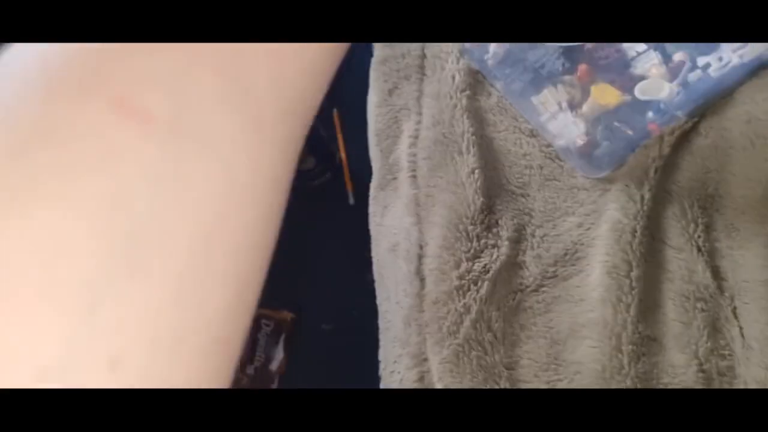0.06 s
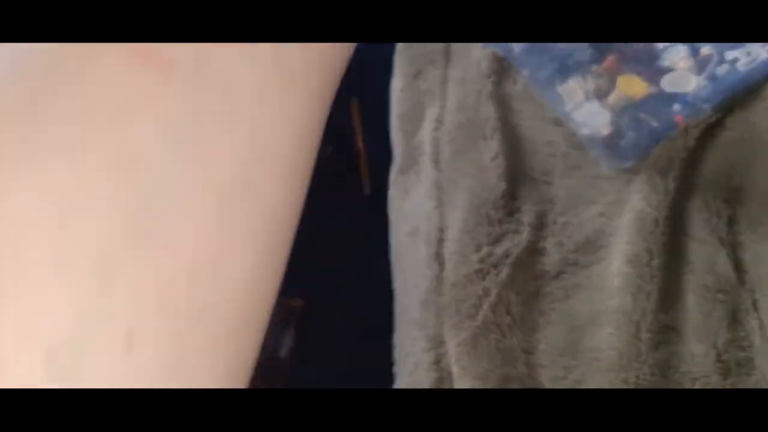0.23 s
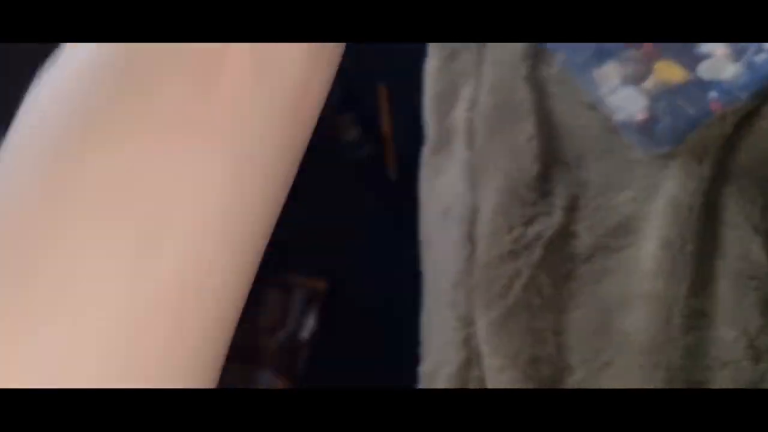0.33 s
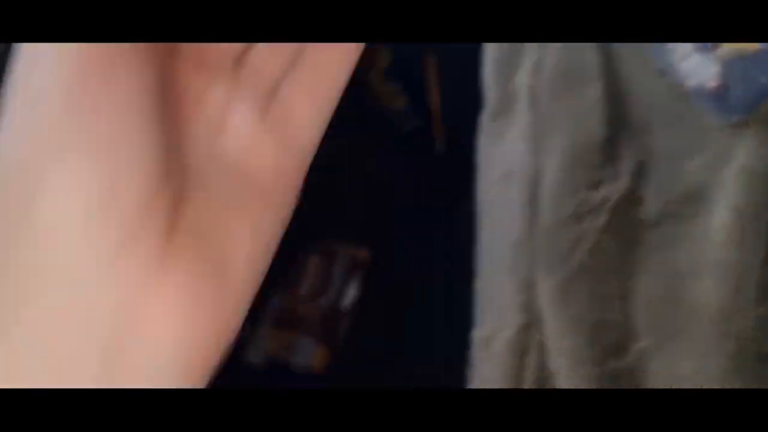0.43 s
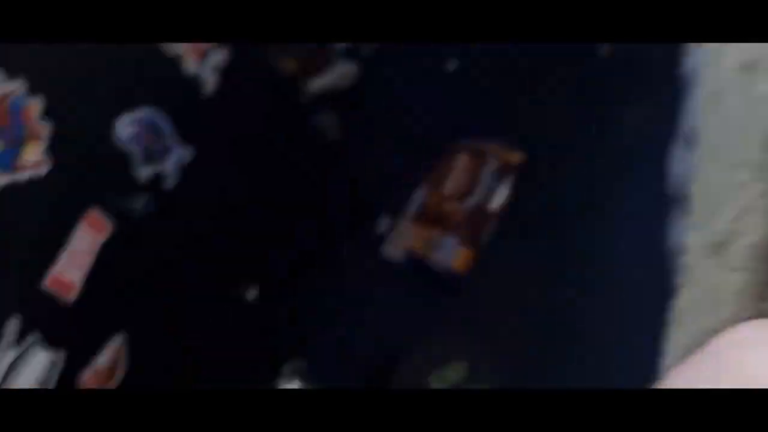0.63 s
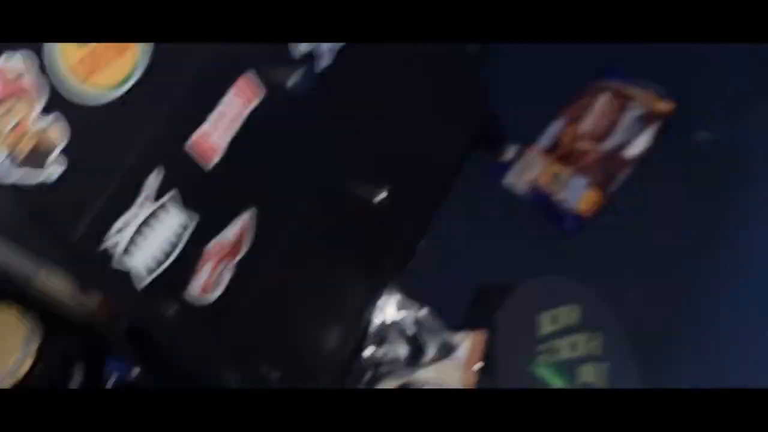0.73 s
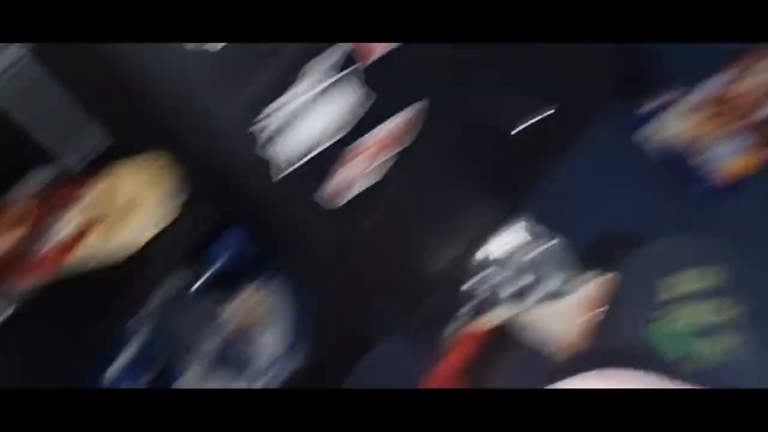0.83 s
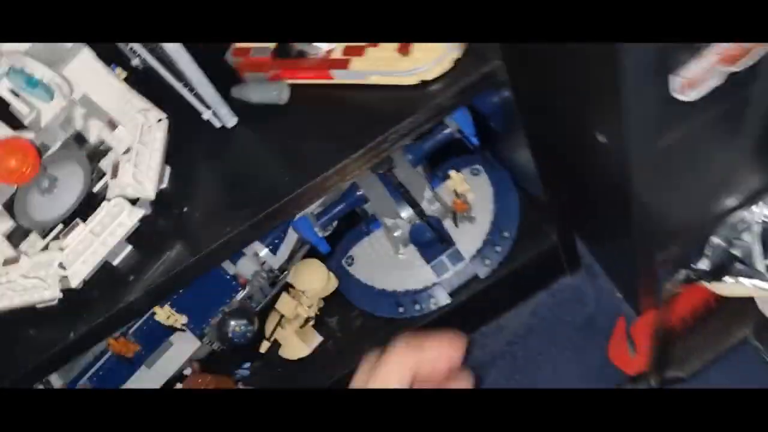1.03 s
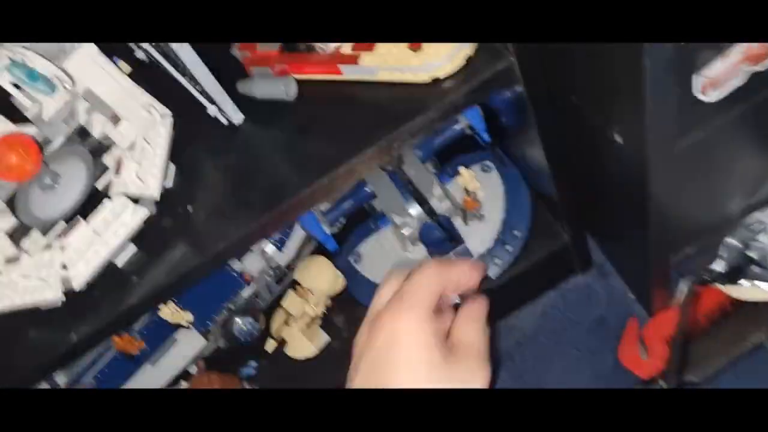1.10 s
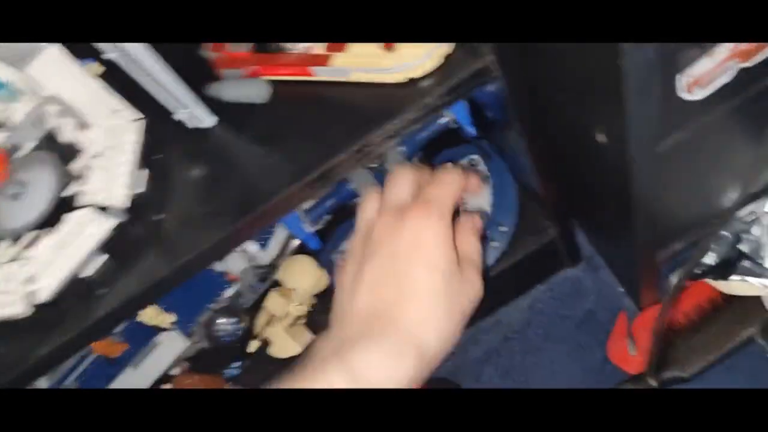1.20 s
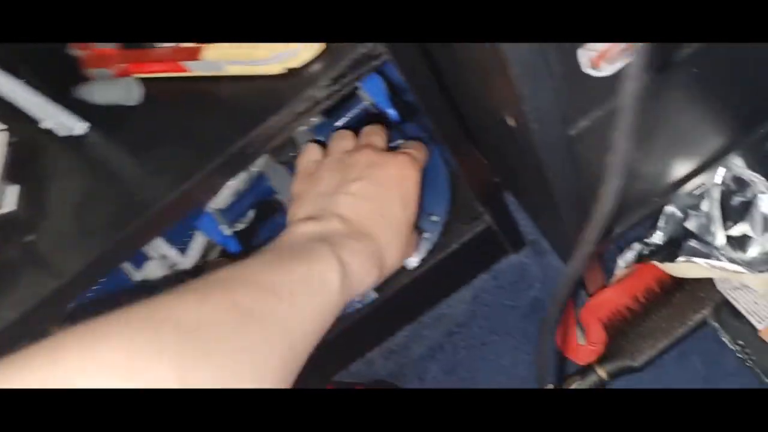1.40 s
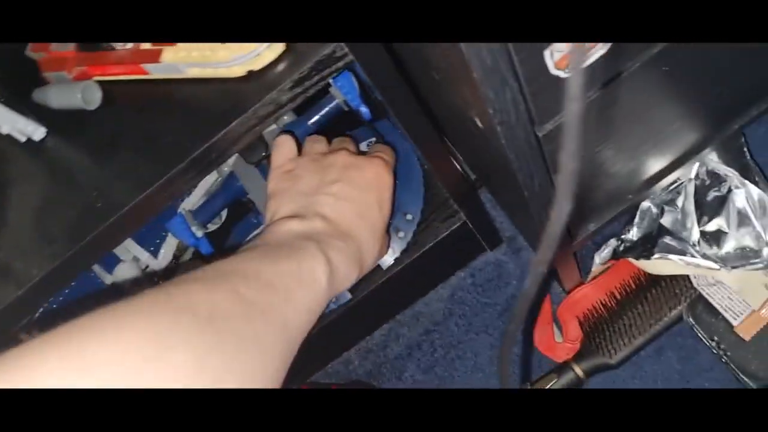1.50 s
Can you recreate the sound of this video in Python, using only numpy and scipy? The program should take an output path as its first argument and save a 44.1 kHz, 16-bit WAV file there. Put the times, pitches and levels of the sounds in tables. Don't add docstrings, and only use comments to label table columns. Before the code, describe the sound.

After a faint rustle and tick, a burst of plastic bricks rattles and booms on a board, thinning to single knocks; low grip thumps and a cloth brush follow, then a very faint finger touch, close indoors.

```python
import sys
import numpy as np
from scipy import signal
from scipy.fft import rfft, irfft
from scipy.io import wavfile

SR = 44100
rng = np.random.default_rng(int(sys.argv[2]) if len(sys.argv) > 2 else 0)


def invert_db(x):
    u = np.asarray(x, float) / 20
    return 10 ** u


def to_wav(sig):
    pcm = np.clip(np.atleast_2d(sig), -1, 1) * 32767
    pcm = np.round(pcm).astype(np.int16)
    wavfile.write(sys.argv[1], SR, pcm.T)


N = 68355

# (time [s], level [dB], treble [dB])
TUMBLE_STAGES = [
    [(0.2315, -30, -14), (0.238, -34, -10.5), (0.253, -29, -14.5), (0.275, -33, -17.5), (0.278, -32, -10),
     (0.287, -25, -19.5), (0.296, -28, -3), (0.303, -29, -9.5), (0.318, -29, -15.5)],
    [(0.335, -36.5, -15.5), (0.385, -41, -19.5), (0.4, -47, -19), (0.405, -40, -18.5), (0.437, -39.5, -15),
     (0.47, -44.5, -17.5), (0.478, -46, -20), (0.49, -49, -22)],
    [(0.493, -50.5, -27), (0.516, -46.5, -33), (0.526, -43.5, -30), (0.544, -55, -30), (0.588, -57.5, -29),
     (0.607, -50, -27), (0.611, -47.5, -24), (0.646, -54.5, -15.5), (0.69, -72.5, -19.5)],
]
# (frequency [Hz], gain [dB])
BRICK_COLOUR = [(300, -25), (600, -11.5), (1150, -7.5), (1700, -8), (7300, -8), (7900, -17.5), (12900, -12),
                (15800, -18)]
# (frequency [Hz], level [dB], time to fall 60 dB [s])
BOARD_MODES = [(715, 0.5, .12), (782, -6, .12), (893, -11, .12), (960, -9, .1), (1118, -1, 0.34),
               (1440, -10, .1), (1767, -3, 0.12), (2312, -12, .08), (2560, -11, 0.21), (2740, -8.5, 0.11),
               (3590, -3.5, .07)]
# (time [s], peak [dB], favoured pitch [Hz])
SHELF_LANDINGS = [(.232, -10.5, 290), (.242, -18, 333), (.252, -8, 262), (.268, -26, 332), (.289, -10, 213),
                  (.294, -5, 222), (.302, -28, 700), (.315, -14, 357), (.324, -20, 347), (.357, -21.5, 356),
                  (.37, -14.5, 328), (.39, -44, 300), (.407, -25, 400), (.415, -17.5, 433),
                  (.433, -36, 430), (.446, -32, 370), (.469, -28.5, 376), (.492, -34, 410), (.52, -27, 430),
                  (.526, -36.5, 468), (.603, -32.5, 350), (.608, -42, 450), (1.247, -52.5, 331),
                  (1.257, -45.5, 399)]
# (frequency [Hz], level [dB], time to fall 60 dB [s])
SHELF_MODES = [(212, -1, .06), (263, 0, .08), (327, 3, .09), (358, 0, .13), (432, 1, .11), (540, -15, .1),
               (704, -9, .08), (958, -12, .06), (1133, -7, .09)]
# (time [s], peak [dB], pitch [Hz], ring length [cycles])
BRICK_KNOCKS = [(0.2325, -19, 7000, 46), (.278, -14, 6130, 30), (.287, -9, 4150, 25),
                (.305, -18.5, 1450, 28), (0.399, -24, 960, 8.8), (.404, -24, 3550, 21),
                (0.433, -18.5, 1120, 14), (.432, -29.5, 3670, 52), (0.4917, -20, 1090, 5.2),
                (.519, -31, 920, 6), (0.525, -39, 3500, 22), (0.5504, -22.5, 1206, 17),
                (.568, -29, 880, 3.8), (0.568, -44, 6100, 50), (.58, -43, 6200, 53), (0.609, -40, 4870, 15),
                (.612, -26, 1220, 12), (0.621, -49, 1000, 6.6), (.694, -36, 490, 32),
                (0.699, -38.5, 1000, 7.3), (.7, -46, 508, 18), (.703, -34, 497, 19), (0.761, -37, 1240, 13),
                (.764, -43.5, 745, 31), (0.764, -42, 1780, 31), (1.257, -59.5, 1060, 57),
                (1.247, -58, 1860, 12), (1.248, -53, 395, 46), (1.262, -57, 305, 16.5),
                (1.486, -38.5, 310, 38), (1.513, -43, 306, 56)]
# (time [s], level [dB])
PART_RUSTLES = [
    [(0, -59), (.04, -68.5), (.06, -60), (.1, -61), (.125, -69), (.16, -83.5)],
    [(1.465, -80), (1.479, -57), (1.497, -67), (1.505, -77)],
]
# (time [s], peak [dB])
PART_TICKS = [
    (0.062, -44),
    (0.073, -62),
    (0.082, -35),
    (0.083, -74),
    (0.092, -75),
]
# (frequency [Hz], level [dB], time to fall 60 dB [s])
PART_MODES = [(3840, -14, .02), (5800, -11, .025), (7197, -23, .06), (9546, -21, .12)]
# (time [s], peak [dB])
MODEL_TOUCHES = [
    (1.471, -68.5),
    (1.4775, -51.5),
    (1.479, -55),
    (1.481, -53.5),
    (1.483, -52),
    (1.4855, -55),
    (1.488, -57),
    (1.492, -61.5),
    (1.495, -61),
    (1.498, -64),
]
# (frequency [Hz], level [dB], time to fall 60 dB [s])
MODEL_PLATES = [(675, -6, 0.075), (1234, -10, 0.028), (1612, 0, 0.076), (2150, -3, 0.043), (2666, 4, 0.068),
                (3160, -9, 0.019), (3794, -5, 0.03), (4690, -12.5, 0.045), (5490, -11, 0.053),
                (7010, -3, 0.026), (6950, -14, .03), (8350, -14.5, 0.025)]
# (time [s], peak [dB], pitch [Hz], left minus right [dB])
GRIP_SLIPS = [(0.728, -27.5, 187, 7.5), (0.742, -26, 182, 3), (0.758, -28.5, 190, 3.5),
              (0.765, -26, 210, 4), (0.786, -28, 210, 4), (0.805, -28.5, 190, 5), (0.827, -34.5, 200, -0.5),
              (0.845, -41, 191.5, 12), (0.853, -35.5, 190.3, 4), (0.866, -49.5, 188, -4.5),
              (1.004, -47, 193, 0), (1.137, -54, 186.8, -22.5), (1.183, -55.5, 188.3, -5.5)]
# (time [s], peak [dB], upper limit [Hz])
CASE_SNAPS = [
    (1.012, -62.5, 886),
    (1.024, -54, 1086),
    (1.034, -43, 2130),
    (1.0574, -42.5, 4060),
    (1.143, -61, 600),
]
# (time [s], level [dB])
CASE_RASP = [
    (1.049, -103),
    (1.051, -74),
    (1.0535, -70),
    (1.055, -91.5),
    (1.0565, -89),
    (1.0575, -71.5),
    (1.06, -80),
    (1.063, -100),
]
# (time [s], level [dB], left minus right [dB])
HAND_PRESSURE = [(0.0, -65, 0), (0.176, -72, 6.5), (0.246, -64, -7), (0.46, -77, -11), (0.486, -55, -4),
                 (0.608, -61, 7), (0.65, -50, 18), (0.69, -65, 4.5), (0.754, -45.5, 13.5),
                 (0.854, -46, 0.5), (0.944, -62, 3.5), (1.022, -47, 4), (1.112, -63, 4),
                 (1.13, -59.5, -10.5), (1.442, -72.5, 2), (1.55, -52.5, -3)]
# (time [s], level [dB])
CLOTH_BRUSH = [
    (.69, -74.5),
    (.765, -64),
    (.83, -73),
    (.922, -72),
    (1.03, -74.5),
    (1.05, -79),
]
# (frequency [Hz], half width [Hz], level [dB])
CLOTH_BANDS = [(1700, 800, -2), (3150, 600, -1), (3800, 600, -4), (6750, 1400, -2)]
# (time [s], level [dB])
FIBRE_HISS = [
    (0.85, -99.5),
    (0.908, -73.5),
    (0.996, -81.5),
    (1.022, -85),
    (1.04, -83.5),
]
# (time [s], level [dB])
SLEEVE_RUSTLE = [
    (1.2, -100),
    (1.3, -86.5),
    (1.37, -78),
    (1.43, -85.5),
    (1.6, -82.5),
]
# (frequency [Hz], left minus right [dB])
HAND_SHADE = [(250, 2), (450, -1.5), (800, 10.5), (1500, 7.5), (3100, 18.5), (6000, 32), (8500, 49),
              (12500, 16.5)]
# (frequency [Hz], gain [dB])
HISS_COLOUR = [(100, -12.5), (450, -10), (850, -19), (2600, -24.5), (7200, -25), (7700, -36.5),
               (10500, -38), (13000, -28), (16000, -35.5)]


def noise(*shape):
    return rng.standard_normal(shape or N)


def rms_one(x):
    return x / np.sqrt(np.mean(x ** 2) + 1e-20)


def level(rows, column=1, outside_db=-140):
    rows = np.array(rows)
    return np.interp(np.arange(N) / SR, rows[:, 0], rows[:, column], outside_db, outside_db)


def colour(x, points):
    p, size = np.array(points), 8192
    hz = np.maximum(np.arange(size // 2 + 1) * SR / size, 1)
    gain_db = np.interp(np.log(hz), np.log(p[:, 0]), p[:, 1])
    cepstrum = irfft(gain_db * np.log(10) / 20)
    cepstrum[1:size // 2] *= 2
    cepstrum[size // 2 + 1:] = 0
    return signal.fftconvolve(x, irfft(np.exp(rfft(cepstrum))))[:N]


def ring(hits, hz, t60):
    r, w = invert_db(-60 / (t60 * SR)), 2 * np.pi * hz / SR
    return signal.lfilter([0, np.sin(w)], [1, -2 * r * np.cos(w), r * r], hits + 1e-18)


def soft(x, hz, kind="low"):
    return signal.sosfilt(signal.butter(2, hz, kind, fs=SR, output="sos"), x)


def clicks(s, height):
    out = np.zeros(N)
    np.add.at(out, (np.asarray(s) * SR).astype(int), height)
    return out


def fading(hits, fade_s, start=1):
    return signal.lfilter([start], [1, -np.exp(-1 / (fade_s * SR))], hits)


def grains(rate, spread_db):
    size = invert_db(spread_db * np.minimum(rng.exponential(1, N), 4.0))
    return size * rng.choice([-1, 1], N) * (rng.random(N) < rate / SR)


def panned(x, db):
    return np.array([x * invert_db(db / 2), x * invert_db(-db / 2)])


def struck(s, db, modes, spread_db):
    own = rng.normal(0, spread_db, (len(s), len(modes)))
    return sum(ring(clicks(s, invert_db(db + m + own[:, k])), hz, t60) for k, (hz, m, t60) in enumerate(modes))


def tumble():
    ring_cycles, slide_db, box_db = 19, -4, -5
    split_hz, treble_db = 6200, 15
    hits = grains(rate=4000, spread_db=3.6)
    dealt = rng.integers(0, 30, N)
    pitches = np.geomspace(450, 15000, num=30)
    bricks = sum(ring(hits * (dealt == k), hz, ring_cycles / hz) for k, hz in enumerate(pitches))
    box = sum(invert_db(db) * ring(hits, hz, t60) for hz, db, t60 in BOARD_MODES)
    mix = rms_one(bricks) + invert_db(slide_db) * noise() + invert_db(box_db) * rms_one(box)
    mix = colour(soft(mix, 350, "high"), BRICK_COLOUR)
    mix = mix / np.std(soft(mix, 1500, "high"))
    low = soft(soft(mix, split_hz), split_hz)
    high = soft(soft(mix, split_hz, "high"), split_hz, "high")
    rows = np.vstack(TUMBLE_STAGES)
    return invert_db(level(rows)) * (low + high * invert_db(treble_db + level(rows, column=2)))


def shelf():
    shelf_db, loss_db_per_octave = -11.5, 8
    s, db, near_hz = np.transpose(SHELF_LANDINGS)
    own = rng.normal(0, 1.6, (len(s), len(SHELF_MODES)))
    out = np.zeros(N)
    for k, (hz, mode_db, t60) in enumerate(SHELF_MODES):
        loss_db = loss_db_per_octave * np.abs(np.log2(hz / near_hz))
        out += ring(clicks(s, invert_db(db + mode_db + shelf_db + own[:, k] - loss_db)), hz, t60)
    return soft(soft(soft(out, 1000), 147, "high"), 90, "high")


def knocks():
    tap_db, crack_db, crack_s = -1, -15.5, .004
    s, db, hz, _ = np.transpose(BRICK_KNOCKS)
    dull = (hz > 600) * (hz < 2000)
    body = sum(ring(clicks(t, invert_db(d)), pitch, cycles / pitch) for t, d, pitch, cycles in BRICK_KNOCKS)
    tap = soft(clicks(s, invert_db(db + tap_db) * dull), [500, 4500], "band")
    fade = fading(clicks(s, invert_db(db + crack_db) * dull), crack_s)
    crack = rms_one(soft(colour(soft(noise(), 800, "high"), BRICK_COLOUR), 3300))
    return body + tap + fade * crack


def jingle():
    s, db = np.transpose(PART_TICKS)
    first, last = (invert_db(level(rows)) for rows in PART_RUSTLES)
    rings = struck(s, db, PART_MODES, spread_db=3.2)
    contacts = grains(rate=12000, spread_db=4.1)
    hiss = rms_one(colour(soft(soft(contacts, 2500, "high"), 2500, "high"), BRICK_COLOUR))
    puffs = fading(clicks(s, invert_db(db)), .003, start=.3)
    return soft(rings, 2900, "high") + (first + puffs) * hiss + last * soft(hiss, 9000)


def model():
    s, db = np.transpose(MODEL_TOUCHES)
    return struck(s, db, MODEL_PLATES, spread_db=2.5)


def slips():
    out = np.zeros((2, N))
    for s, db, hz, pan_db in GRIP_SLIPS:
        hit = clicks(s, invert_db(db))
        edge = invert_db(-25.5) * ring(hit, 1210, 0.014)
        out += panned(soft(ring(hit, hz, 0.022), 506) + edge, pan_db)
    return out


def snaps():
    cut_hz, rebound_hz, pan_db = 530, 106, -26.5
    pole = np.exp(-2 * np.pi * cut_hz / SR)
    out = np.zeros((2, N))
    for s, db, hz in CASE_SNAPS:
        spike = signal.lfilter([-.3], [1, -2 * pole, pole ** 2], clicks(s, invert_db(db)))
        out += panned(soft(soft(spike, rebound_hz, "high"), hz), pan_db)
    return out


def rasp():
    white = noise()
    dull = rms_one(soft(soft(white, 5500), 5500))
    bright = soft(soft(white, 12500, "high"), 12000, "high")
    return panned(invert_db(level(CASE_RASP)) * (dull + 2.5 * bright), -33)


def pressure():
    top_hz, alike, rub_db = 101, 0.1, -25.5
    both, left, right = (rms_one(soft(soft(soft(w, top_hz), 240), 51, "high")) for w in noise(3, N))
    rumble = np.sqrt(alike) * both + np.sqrt(1 - alike) * np.array([left, right])
    rub = np.array([rms_one(soft(w, [200, 900], "band")) for w in noise(2, N)])
    pan_db = level(HAND_PRESSURE, column=2, outside_db=None)
    swell = invert_db(level(HAND_PRESSURE, outside_db=None))
    return 1.31 * (rumble + invert_db(rub_db) * rub) * swell * invert_db([pan_db / 2, -pan_db / 2])


def brush():
    white = noise()
    bands = np.zeros(N)
    for hz, w, db in CLOTH_BANDS:
        patches_db = 2.5 * rms_one(soft(noise(), 12.1))
        band = soft(soft(white, [hz - w, hz + w], "band"), [hz - w / 2, hz + w / 2], "band")
        bands += invert_db(db + patches_db) * rms_one(band)
    fibres = rms_one(soft(soft(white, 9000, "high"), 9000, "high"))
    return invert_db(level(CLOTH_BRUSH)) * rms_one(bands) + invert_db(level(FIBRE_HISS)) * fibres


def sleeve():
    return invert_db(level(SLEEVE_RUSTLE)) * rms_one(soft(noise(2, N), [4200, 7200], "band"))


def room(x):
    t = np.arange(SR // 2) / SR
    out = []
    for cut_hz, db in [(1400, -7.5), (890, 8.5)]:
        tail = soft(noise(len(t)), cut_hz, "high") * invert_db(-60 * t / 0.018) * (t > .001)
        out.append(invert_db(db) * signal.fftconvolve(x, tail / np.linalg.norm(tail))[:N])
    return np.array(out)


def shaded(x):
    lag_s, depth = .00015, 1.34
    hz, p = np.arange(1, N + 2) * SR / (2 * N), np.array(HAND_SHADE)
    gain = invert_db(-depth * np.interp(np.log(hz), np.log(p[:, 0]), p[:, 1]))
    return irfft(rfft(x, 2 * N) * gain * np.exp(-2j * np.pi * hz * lag_s))[:N]


def hiss():
    floor = [invert_db(-77) * rms_one(colour(soft(w, 100, "high"), HISS_COLOUR)) for w in noise(2, N)]
    sway_db = rms_one(soft(noise(2, N), 3.5)) * 0
    return floor * invert_db(sway_db)


def scene():
    near = 1.806 * (tumble() + brush()) + knocks() + model() - shelf()
    left, right = near + room(near) + 2.1 * jingle() * invert_db([[0], [1.5]])
    background = (hiss() + sleeve()) * invert_db([[2.5], [-3.5]])
    return np.array([left, shaded(right)]) + slips() + snaps() + rasp() + pressure() + background


def top_cut(x):
    return signal.sosfilt(signal.butter(12, 16510, fs=SR, output="sos"), x)


def record(dry):
    limit, cut_hz = 0.68, 16600
    rounded = limit * np.tanh(dry / limit)
    mix = signal.sosfilt(signal.cheby2(12, 60, cut_hz, fs=SR, output="sos"), rounded)
    return top_cut(mix)


dry = scene()
out = record(dry)
to_wav(out)
```